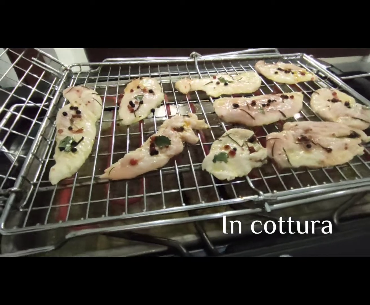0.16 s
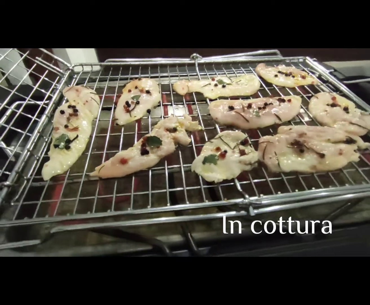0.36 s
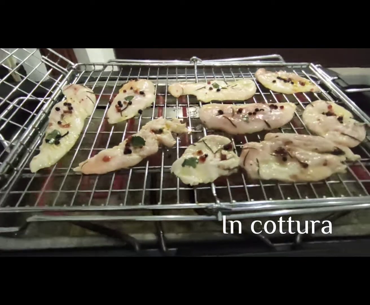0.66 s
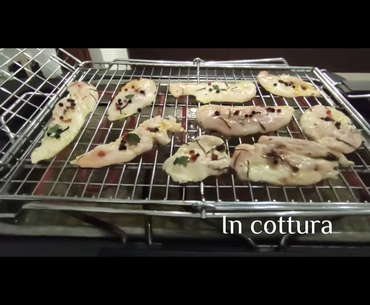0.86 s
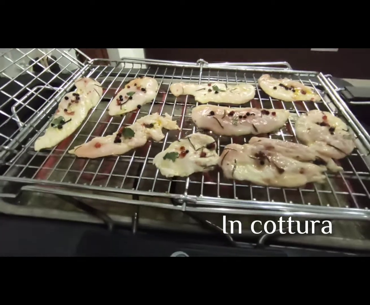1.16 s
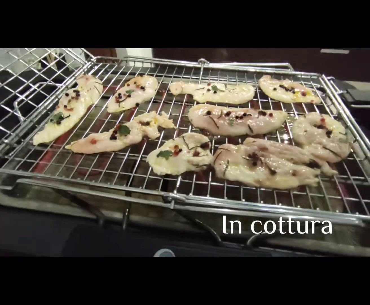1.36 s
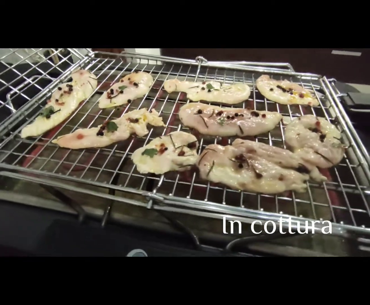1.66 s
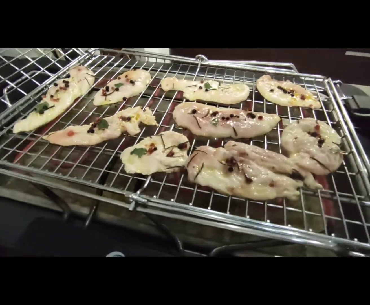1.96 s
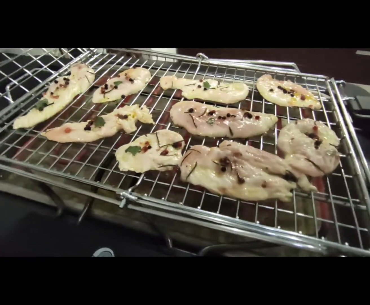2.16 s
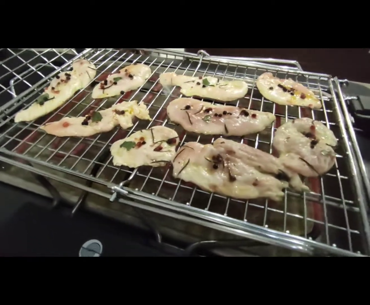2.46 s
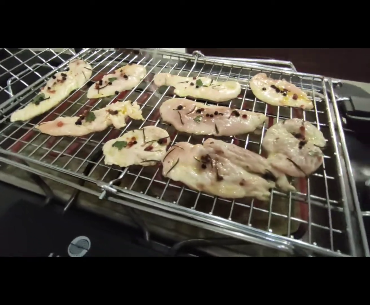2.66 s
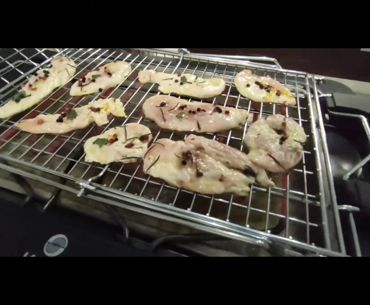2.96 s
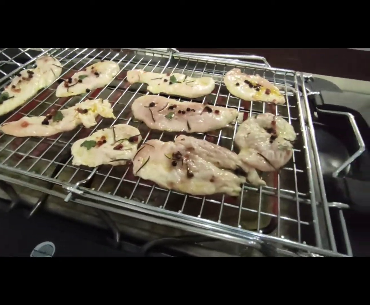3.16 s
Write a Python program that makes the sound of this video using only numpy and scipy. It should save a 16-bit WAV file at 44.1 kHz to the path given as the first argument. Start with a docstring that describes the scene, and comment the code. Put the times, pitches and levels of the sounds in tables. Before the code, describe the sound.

Meat sizzling close by on a kitchen grill, with fat popping and spitting now and then.

```python
"""A kitchen, where chicken sizzles on an electric grill close to a hand-held camera.
Tiny bursting bubbles merge into a steady fizz; drops of fat pop, some with a short high ring, and the fat
flares into spurts and spray. The grill's metal pings, an appliance hums, faint hollow tones swell and
something ticks fast and faintly. The room reverberates, and both microphone ports resonate near 8 kHz."""
import sys
import numpy as np
from scipy import signal
from scipy.fft import rfft, irfft
from scipy.io import wavfile
from scipy.ndimage import uniform_filter1d

SR = 44100
rng = np.random.default_rng(int(sys.argv[2]) if len(sys.argv) > 2 else 0)


def to_wav(sig):
    """Store sig (one row per channel, or 1-D mono) as 16-bit WAV at the path in sys.argv[1].

    Samples outside -1..1 are clipped; the rate is SR.
    """
    pcm = np.clip(np.atleast_2d(sig), -1, 1) * 32767
    pcm = np.round(pcm).astype(np.int16)
    wavfile.write(sys.argv[1], SR, pcm.T)  # frames by channels


N = 145530
T = np.arange(N) / SR


def amp(db):
    """Amplitude ratio of a level in decibels."""
    return 10 ** (np.asarray(db) / 20)


def unit(x):
    """Normalisation to rms 1."""
    return x / np.sqrt(np.mean(x ** 2) + 1e-20)


def sides(left_db, right_db):
    """Level difference between the two ports, as a column of gains."""
    return amp([left_db, right_db])[:, None]


def read(points, hz, column=1):
    """Interpolation of a table's column on a log-frequency axis."""
    table = np.transpose(points)
    return np.interp(np.log(hz + 1), np.log(table[0] + 1), table[column])


def level(points):
    """Amplitude envelope through points of time in seconds and level in dB."""
    return amp(np.interp(T, *np.transpose(points)))


def add(mix, start_s, sound):
    """Superposition of a sound on the mix."""
    part = mix[max(round(start_s * SR), 0):][:len(sound)]
    part += sound[:len(part)]


def colour(x, points, column=1, size=4096):
    """Minimum-phase filtering: the gain curve determines a causal impulse response."""
    hz = abs(np.fft.fftfreq(size, 1 / SR))
    log_gain = np.log(amp(read(points, hz, column)))
    response = np.exp(np.conj(signal.hilbert(log_gain)))
    taps = np.fft.ifft(response).real[:size // 2]
    return signal.oaconvolve(x, taps)[:N]


def drift(samples):
    """Slow fluctuation of rms 1: noise smoothed by two moving averages."""
    return unit(uniform_filter1d(uniform_filter1d(rng.standard_normal(N), samples), samples))


def bubbles(envelope, spectrum, per_s, spread_db, flutter_db):
    """Shot noise: bubbles burst independently, as impulses of unequal, fluttering strength."""
    strength = amp(spread_db * np.minimum(rng.exponential(1, N), 3.5))
    bursts = unit(strength * rng.choice([-1, 1], N) * (rng.random(N) < per_s / SR))
    flutter = amp(flutter_db * drift(samples=200))
    return level(envelope) * unit(colour(bursts * flutter, spectrum))


def fizzing():
    """Dense shot noise: tiny bursts overlap into a steady fizz."""
    envelope = [(0, -57.5), (.4, -61), (.8, -61.5), (1.1, -58), (1.45, -64), (1.68, -63), (1.85, -63),
                (2.15, -63), (2.7, -64), (3.3, -64)]  # Each row: time in seconds, level in dB.
    spectrum = [(200, -12.5), (1000, -2), (2800, 0), (4200, 6.5), (6000, 0.5), (7500, 0), (9000, 4),
                (11000, 1), (13500, -7), (15500, -6.5)]  # Each row: frequency in Hz, gain in dB.
    return bubbles(envelope, spectrum, per_s=9000, spread_db=2.5, flutter_db=6)


def spurting():
    """Shot noise in surges: boiling fat spurts in sparser, very unequal bursts."""
    envelope = [(0, -62), (.13, -98), (.18, -57), (.28, -71), (.938, -79), (.953, -63), (1.05, -74),
                (2.15, -74), (2.18, -55.5), (2.222, -57), (2.28, -47), (2.335, -57), (2.41, -50),
                (2.46, -58.5), (2.52, -80), (2.91, -64), (2.95, -47.5), (3, -77)]  # Each row: time in seconds, level in dB.
    spectrum = [(100, -52), (350, -2), (700, 2), (2200, -8), (3400, -11), (5500, 8), (8000, 4), (11000, -4),
                (14000, 2)]  # Each row: frequency in Hz, gain in dB.
    return bubbles(envelope, spectrum, per_s=2500, spread_db=7.5, flutter_db=5)


def spraying():
    """Bright shot noise: fine spray hisses off the boiling fat."""
    envelope = [(0, -66), (.1, -79), (.7, -69.5), (.9, -67), (.96, -87), (2.15, -77), (2.18, -56.5),
                (2.27, -52), (2.34, -61), (2.45, -56.5), (2.6, -77)]  # Each row: time in seconds, level in dB.
    spectrum = [(1000, -12.5), (3500, -5), (5500, -4.5), (8000, -7), (10500, 0.5), (13500, -3),
                (15500, -5.5)]  # Each row: frequency in Hz, gain in dB.
    return bubbles(envelope, spectrum, per_s=1200, spread_db=0.5, flutter_db=5)


def room_noise():
    """Partial coherence: the kitchen's low noise is only partly alike at the two ports."""
    spectrum = [(20, 9), (50, 2.5), (100, -4), (170, 2.5), (300, -1.5), (430, -3.5), (700, -4.5),
                (1200, -10), (2500, -17), (8000, -77)]  # Each row: frequency in Hz, gain in dB.
    coherence = [(30, 0.053), (90, 0.072), (200, 0.64), (1000, 0.26), (4000, .2)]  # Each row: frequency in Hz, correlation between the ports.
    hz = np.fft.rfftfreq(N, 1 / SR)
    left, independent = rfft(rng.standard_normal((2, N)))
    shared = read(coherence, hz)
    right = shared * left + np.sqrt(1 - shared ** 2) * independent
    return sides(-62.5, -67.5) * unit(irfft(np.array([left, right]) * amp(read(spectrum, hz)), N))


def appliance_hum(waver_hz=1.24):
    """Frequency modulation: each of the appliance's three tones wavers slowly at random."""
    tones = [(166, -64.5, -71.5), (206, -72.5, -99), (417, -79, -98)]  # Each row: frequency in Hz, left level in dB, right level in dB.
    out = np.zeros((2, N))
    for hz, left_db, right_db in tones:
        phase = 2 * np.pi * np.cumsum(hz + waver_hz * drift(samples=6000)) / SR
        out += sides(left_db, right_db) * unit(np.sin(phase))
    return out


def ticking(per_s=116, jitter_s=.0004, spread_db=2):
    """A nearly periodic impulse train close to the right port, probably the camera's mechanism."""
    envelope = [(0, -69), (.7, -60), (1.4, -67), (1.85, -62), (2.6, -63), (3.3, -57.5)]  # Each row: time in seconds, level in dB.
    spectrum = [(300, -1.5), (2500, -7.5), (4500, -8.5), (7500, 2.5), (9500, 4.5), (15000, -10)]  # Each row: frequency in Hz, gain in dB.
    ticks = np.zeros(N)
    for start in np.arange(0, N / SR, 1 / per_s):
        late, strong = rng.standard_normal(2)
        add(ticks, start + jitter_s * late, amp([spread_db * strong]))
    return sides(-47, -1.5) * level(envelope) * unit(colour(ticks, spectrum))


def brighten(x, tilt_db, pivot_hz=6760):
    """Spectral tilt: a positive value lowers the body and lifts the top about the pivot."""
    hz = np.fft.rfftfreq(2 * len(x), 1 / SR)
    gain = amp(0.935 * tilt_db * np.tanh(hz / pivot_hz - 1))
    tilted = irfft(rfft(x, 2 * len(x)) * gain)
    return np.roll(tilted, 8)[:len(x)]  # a short delay keeps the onset whole


def pops_and_clicks(crack_s=.00004, crack_delay_s=.0006, puff_s=.0014, puff_ratio=1.18, scatter_hz=3130):
    """Scattering: the wires wrap each crack in a treble puff. Returns the direct pair and room feed."""
    # Each row: start in seconds, level in dB, treble tilt in dB, gain into the room in dB.
    pops = [(.127, -34, 10, -10), (0.1459, -19, 5, -0.5), (0.1872, -24, -1, -0.5), (0.215, -32, 20, -2),
            (.252, -34, 5, -4), (0.315, -32, 7, -8), (0.3634, -27.5, 7, -4), (.5127, -32, 2, 0),
            (0.5466, -30.5, 1, -3), (0.7662, -33.5, 14, -7), (0.8917, -32.5, 18, -5),
            (0.9383, -9.5, 0.5, 1.5), (0.9533, -23, 8, -3), (1.1636, -18, 5.5, 0), (2.067, -37, 14, 0),
            (2.1849, -27.5, 7, 4), (2.191, -28, 12, 9), (2.251, -28, 1, 9), (2.2573, -22.5, -13, 2.5),
            (2.2745, -19.5, 10, 5), (2.2857, -20, -12, 0.5), (2.338, -19, 3, -14), (2.366, -10, -0.5, 0.5),
            (2.4247, -16.5, 0, -1.5), (2.5573, -27, 9, 1), (2.566, -30, 12, 0), (2.6849, -23, 0, -5),
            (2.7256, -25, 5, -0.5), (2.858, -32.5, 6, 8), (2.88, -26.5, 12, -5), (2.9221, -18, -1.5, -1),
            (2.9517, -22.5, -5, 1.5), (2.9618, -20.5, 9, -9), (2.993, -18.5, 15, -11),
            (3.0102, -6, 2, -3.5)]
    spectrum = [(100, -28), (380, -4), (700, 5), (1200, 4.5), (1600, -0.5), (2300, 4), (3400, -3),
                (4500, -1), (7500, -0.5), (10000, 2.5), (14000, -1)]  # Each row: frequency in Hz, gain in dB.
    left, right, feed = np.zeros((3, N))
    t = np.arange(512) / SR
    pulse = (1 - t / crack_s) * np.exp(-t / crack_s)
    pulse /= np.linalg.norm(pulse)
    direct_path = np.arange(len(t)) == round(crack_delay_s * SR)
    highpass = signal.butter(1, scatter_hz, "high", fs=SR)
    for start, db, tilt_db, room_db in pops:
        crack = amp(db) * brighten(pulse, tilt_db)
        add(feed, start, amp(room_db) * crack)
        for port in (left, right):
            noise = rng.standard_normal(len(t)) * np.sqrt(t) * np.exp(-t / puff_s)
            puff = signal.lfilter(*highpass, noise)
            paths = direct_path + puff_ratio * puff / np.linalg.norm(puff)
            add(port, start, np.convolve(crack, paths / np.linalg.norm(paths)))
    return np.array([colour(left, spectrum), colour(right, spectrum)]), colour(feed, spectrum)


def high_rings(centre_hz=7320, detune=.015, rise_s=.00043, fall_s=.00067):
    """Damped oscillation: dry high rings rise, hold briefly and decay, mostly at the right port."""
    rings = [(0.239, -28, 0.0011), (.9394, -13.5, 0.00059), (1.164, -27, 0.0012), (2.3662, -30, 0.0022),
             (2.921, -18.5, .001), (2.923, -18.5, 0.0014), (2.94, -20.5, 0.0029), (2.946, -19, 0.0014),
             (2.9563, -30, .001), (2.9608, -18, 0.0013), (2.9664, -18.5, 0.0018), (2.972, -28, 0.0057),
             (2.9923, -10, 0.00099), (3.009, -12, 0.0028)]  # Each row: start in seconds, level in dB, seconds until the decay begins.
    out, t = np.zeros(N), np.arange(512) / SR
    for start, db, hold in rings:
        envelope = np.minimum(t / rise_s, 1) * np.exp(-np.maximum(t - hold, 0) / fall_s)
        hz = centre_hz * (1 + detune * rng.standard_normal())
        add(out, start, amp(db) * envelope * np.sin(2 * np.pi * hz * t))
    return sides(-45, 0) * out


def metal_knocks():
    """Free vibration: each knock excites one damped mode of the grill; the shortest are mere ticks."""
    # Each row: start in seconds, level in dB, frequency in Hz, decay time in seconds.
    knocks = [(.9395, -50.5, 2290, .012), (1.181, -50.5, 413, 0.0072), (1.587, -42.5, 4300, 0.0002),
              (2.922, -43.5, 1204, 0.0034), (3.1247, -32.5, 2480, 0.00034)]
    out, t = np.zeros(N), np.arange(4096) / SR
    for start, db, hz, decay in knocks:
        add(out, start, amp(db) * np.sin(2 * np.pi * hz * t) * np.exp(-t / decay))
    return out


def hollow_tones():
    """Resonance: noise in a single band swells and fades as a faint hollow tone."""
    # Each row: start in seconds, length in seconds, centre in Hz, bandwidth in Hz, level in dB.
    swells = [(1.333, 0.61, 424, 79, -71), (1.402, 0.51, 676, 500, -77), (1.907, 0.093, 654, 130, -71)]
    out = np.zeros(N)
    for start, length, hz, width, db in swells:
        arch = np.sqrt(np.hanning(int(length * SR)))
        radius = np.exp(-np.pi * width / SR)
        feedback = [1, -2 * radius * np.cos(2 * np.pi * hz / SR), radius ** 2]
        tone = unit(signal.lfilter([1, 0, -1], feedback, rng.standard_normal(len(arch))))
        add(out, start, amp(db) * arch * tone)
    return out


def reverberation(x, gap_s=.0028, density=.15, gain_db=-2.5, size=32768):
    """A diffuse field: dense reflections, different at each port, decay exponentially in each band."""
    decay_times = [(200, 0.23), (1000, 0.35), (2800, 0.51), (7500, 0.62), (15000, 0.4)]  # Each row: frequency in Hz, seconds to fall by 60 dB.
    reflections = rng.standard_normal((2, size)) * (rng.random((2, size)) < density)
    reflections *= np.arange(size) / SR > gap_s
    hz, t, bands = signal.stft(reflections, SR, nperseg=256)
    decay = amp(-60 * t / read(decay_times, hz)[:, None])
    tail = signal.istft(bands * decay, SR, nperseg=256)[1]
    tail /= np.linalg.norm(tail[0])
    return amp(gain_db) * signal.fftconvolve(x[None], tail, axes=1)[:, :N]


def microphone_ports(left, right):
    """Port resonance: each opening emphasises the band near 8 kHz."""
    response = [(20, 3.5, 3), (3340, -1, -1), (4300, 1.5, 0), (5350, 1, 3.5), (6430, -2, 5),
                (7270, 10.5, 16), (7890, 12, 16), (8490, 19, 13), (9405, 8, 1), (10320, -3, -8),
                (11900, -0.5, -2), (15100, -0.5, -3), (15700, -35, -19.5)]  # Each row: frequency in Hz, left gain in dB, right gain in dB.
    return np.array([colour(left, response, column=1), colour(right, response, column=2)])


def scene():
    """Superposition of direct and reverberant sound at the two ports, with the high rings on top."""
    fizz, spurts = fizzing(), spurting() + spraying()
    background = room_noise() + appliance_hum() + ticking()
    pops, pop_feed = pops_and_clicks()
    rings, metal, hollow = high_rings(), metal_knocks(), hollow_tones()
    direct = sides(-15.5, -6.5) * fizz + sides(1, 6) * spurts
    direct += sides(-2, 2.5) * pops + sides(5.5, 0) * (metal + hollow)
    direct[0] = np.roll(direct[0], round(.0001 * SR))  # the grill is nearer the right port
    room = reverberation(fizz + spurts + pop_feed + amp(-1) * metal + hollow)
    left, right = direct + room + background
    return microphone_ports(left, right) + rings


def record(dry):
    """Band limiting: a linear-phase low-pass filter removes the highest treble."""
    cutoff_hz = 16400
    lowpass = signal.firwin(255, cutoff_hz, window=("kaiser", 9), fs=SR)
    return signal.oaconvolve(dry, lowpass[None], "same")


dry = scene()
out = record(dry)
to_wav(out)
```